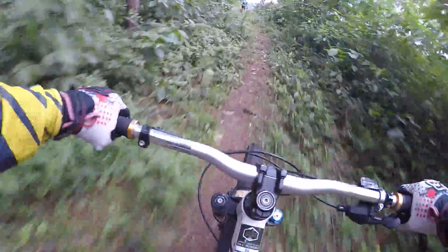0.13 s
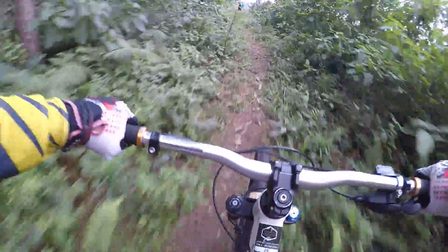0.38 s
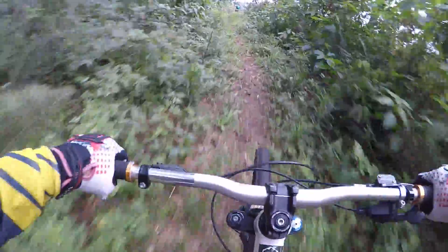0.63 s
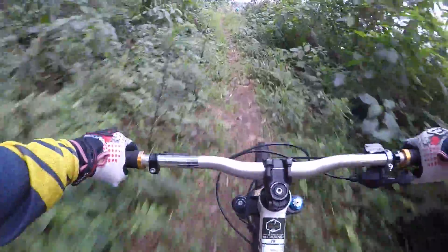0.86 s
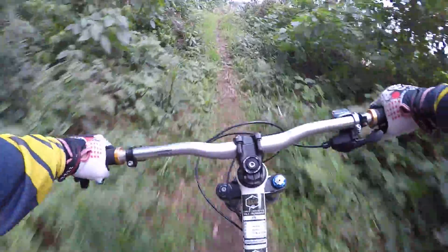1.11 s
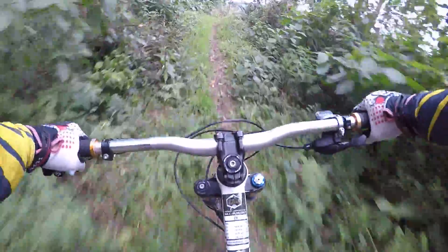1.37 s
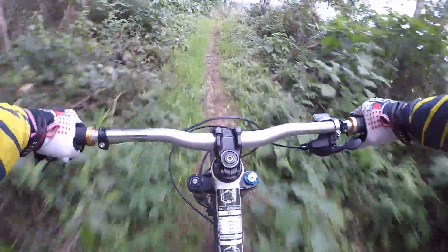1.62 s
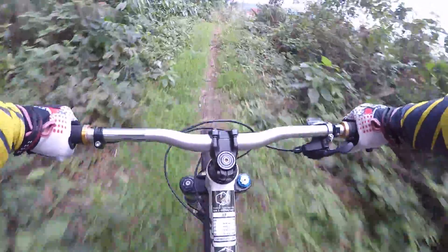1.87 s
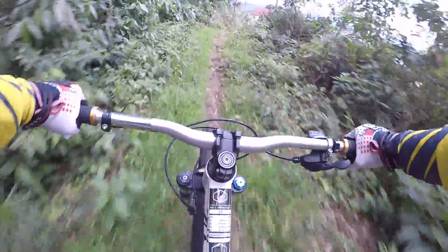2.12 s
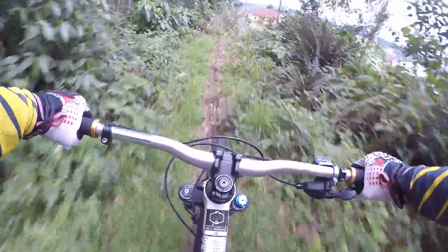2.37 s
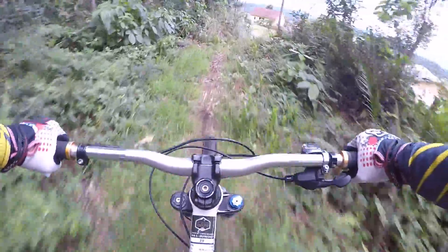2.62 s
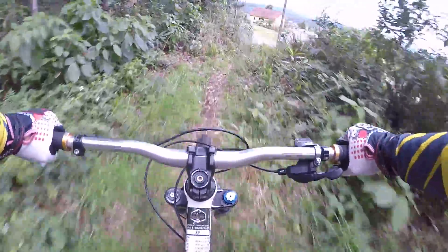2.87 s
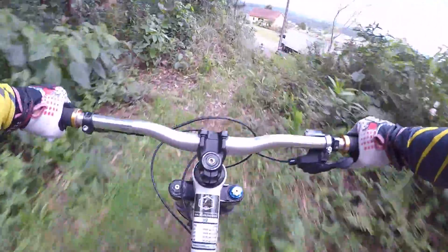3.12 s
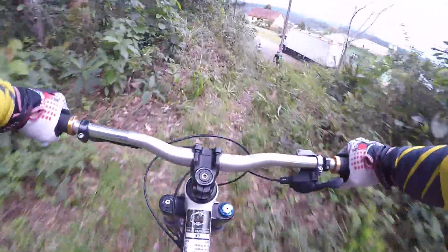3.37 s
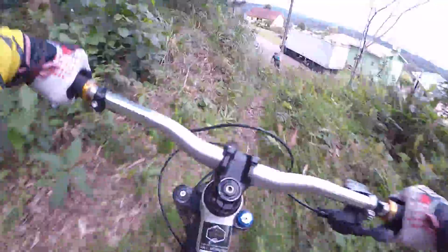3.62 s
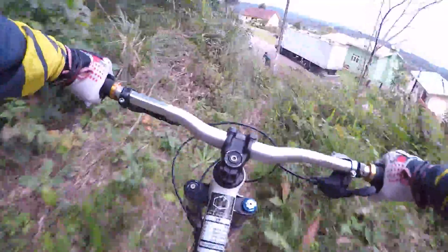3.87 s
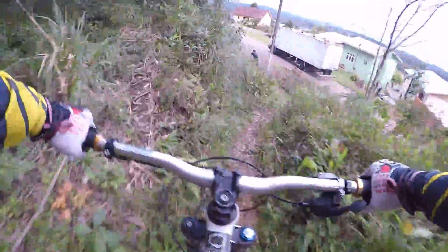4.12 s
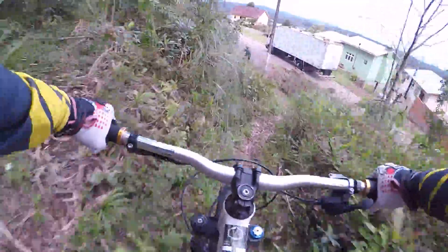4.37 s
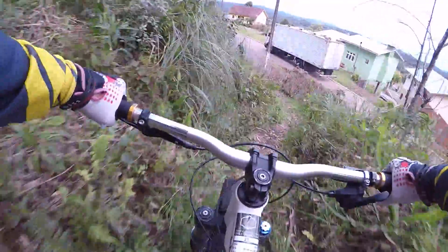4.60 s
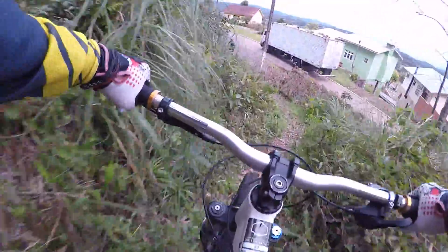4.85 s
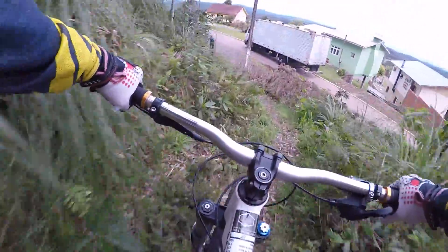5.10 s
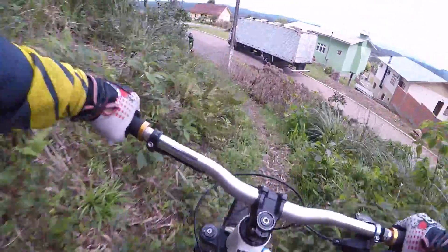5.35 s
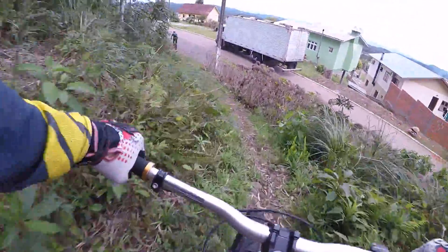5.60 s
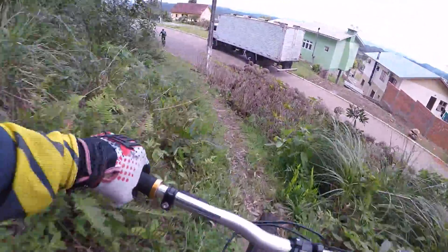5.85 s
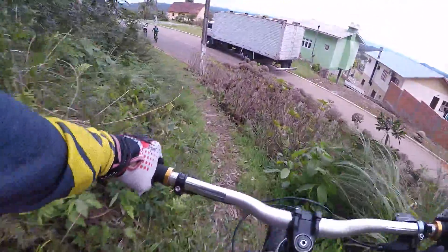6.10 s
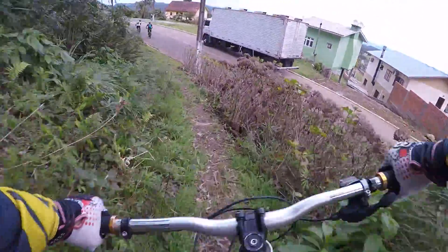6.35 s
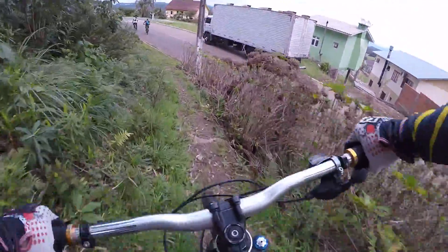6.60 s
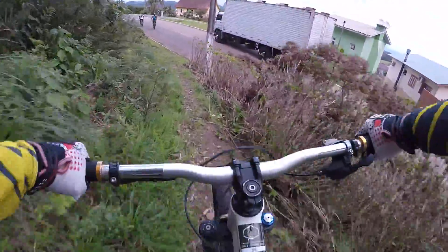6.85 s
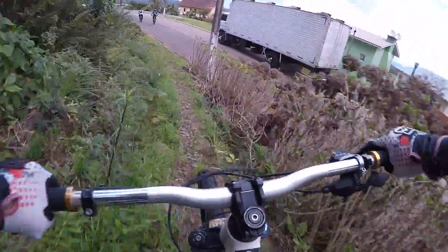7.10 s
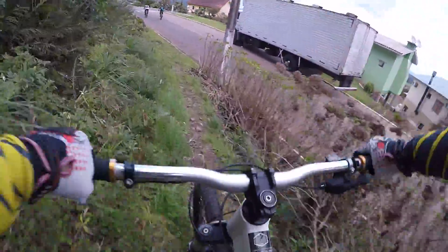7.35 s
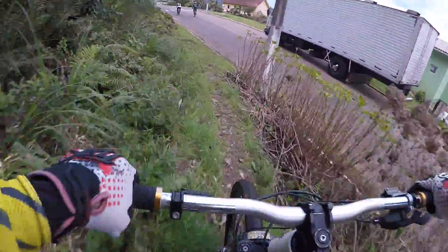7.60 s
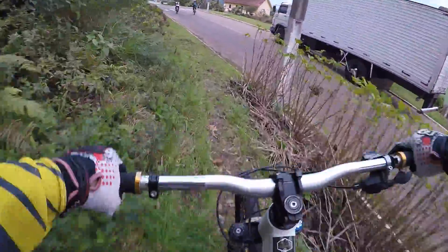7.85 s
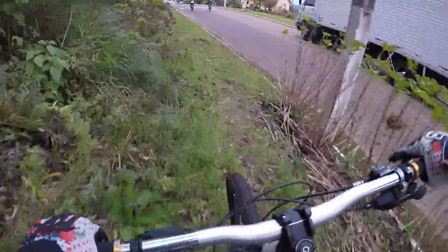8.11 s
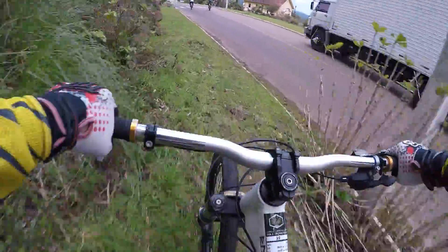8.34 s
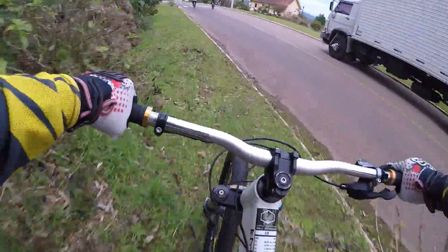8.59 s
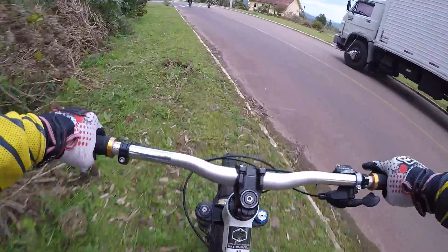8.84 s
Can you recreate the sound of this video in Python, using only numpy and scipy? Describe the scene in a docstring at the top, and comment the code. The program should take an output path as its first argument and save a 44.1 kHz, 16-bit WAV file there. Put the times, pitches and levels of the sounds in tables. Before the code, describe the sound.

Close, wind-buffeted microphone on a cyclist's chest. Tyres hiss through grass and dirt, the freewheel whirrs, a brake disc rubs very faintly, and short metallic knocks come irregularly. Midway, gusts become lighter and clicks slower and clearer. Later the wind returns, plants brush past, spokes ping, and a dense run of rattles and dull thuds comes near the end.

```python
"""Grassy dirt trail: a mountain bike coasts downhill, heard at one microphone on the rider's chest.
Wind is four bands of noise swelled by gusts; tyres, grass and brushing plants are flickering noise.
The freewheel is a noise burst per tooth; the brake disc is resonators under continuous, uneven rubbing.
Knocks, thuds and spoke pings are resonators hit by ragged blows; one bird is a falling sine."""
import sys
import numpy as np
from scipy import signal
from scipy.io import wavfile
from scipy.ndimage import uniform_filter1d

SR = 44100
rng = np.random.default_rng(int(sys.argv[2]) if len(sys.argv) > 2 else 0)


def field_ratio(decibels):
    """Amplitude ratio for a level in dB (20 dB per decade); scalars and array-likes work."""
    return 10 ** (np.asarray(decibels, dtype=float) / 20)


def dump(signal):
    """Clip the signal to [-1, 1] and save it as 16-bit WAV at the path in sys.argv[1]."""
    limited = np.clip(np.atleast_2d(signal).T, -1, 1)
    pcm = np.round(limited * 32767).astype(np.int16)
    wavfile.write(sys.argv[1], SR, pcm)


N = 395577

# Levels below are ahead of the output gain in record(); spectra are relative.
# Wind at the ports: t/s, strength/dB, churn/dB (gain of small fast eddies on large slow ones)
WIND_COURSE = [(0.0, -18.5, 1), (0.35, -17.5, 5.0), (0.6, -21.0, 3.5), (0.9, -24.5, -2), (1.3, -20.0, 0.0),
               (1.7, -19.5, 0), (2.1, -18, -2), (2.5, -21.0, 2.0), (2.9, -23.5, -0.5), (3.3, -29.0, 1),
               (3.9, -30, 2), (4.5, -29, -0.5), (5.1, -30.5, -0.5), (5.6, -25.5, 1.5), (6.1, -30.5, -2),
               (6.6, -25, 0.0), (7.0, -23.5, 0), (7.5, -21.5, 2.5), (8.0, -22.0, 3), (8.45, -19.5, 9.5),
               (8.97, -21.5, -1.0)]
# Spectra of the wind layers, large eddies to small: f/Hz, density/dB per Hz
BUFFET_SPECTRUM = [(8, -9), (20, -0.5), (30, -3), (45, -5), (60, -34)]
THUMP_SPECTRUM = [(35, -15), (50, 1.5), (65, -1.5), (80, -8), (100, -13.5), (130, -37.5)]
FLUTTER_SPECTRUM = [(70, -16), (100, 4), (160, 0.5), (220, 0), (260, -9.5), (330, -29.5)]
ROAR_SPECTRUM = [(200, -48), (260, 0), (320, -2.5), (390, -7), (440, -18), (500, -22), (560, -51),
                 (700, -73)]
# Response of buffet, thump, flutter, roar:
# centre f/Hz, level/dB at strength -20 dB, share of strength (dB/dB), share of churn (dB/dB)
EDDY_RESPONSE = [(30, -13, 1.0, -1.08), (63.3, -17, 0.59, 0.28), (161.5, -21.5, 0.96, 0.99),
                 (340, -30, 1.12, 0.84)]
# Gusts and lulls: t/s, swell/dB, f/Hz of the eddies stirred most, length/s (full width at half swell)
GUST_EVENTS = [(0.288, 4, 55, 0.09), (0.467, 9, 340, 0.07), (0.56, 3.5, 251, 0.041), (0.64, -5.5, 55, 0.18),
               (0.7, -5.5, 340, 0.13), (1.017, 5.5, 102, 0.065), (1.162, -6, 340, 0.12),
               (1.443, 4, 340, 0.13), (1.445, 5.5, 74, 0.091), (1.59, -7.5, 101, 0.1),
               (1.973, 4.0, 340, 0.16), (2.184, -4, 74, 0.1), (2.29, -2.5, 340, 0.25),
               (2.37, 5.5, 30, 0.14), (2.478, 7.5, 136, 0.036), (2.677, 5, 340, 0.14),
               (2.785, 4.5, 40, 0.041), (2.98, 7.5, 30, 0.066), (3.153, -3.5, 340, 0.18),
               (3.18, -8.5, 40, 0.091), (3.497, 9.0, 134, 0.088), (3.52, 6.0, 30, 0.071),
               (3.63, -6, 74, 0.08), (3.853, -20, 98, 0.097), (4.064, 4.5, 340, 0.22),
               (4.207, -11.5, 100, 0.074), (4.427, -13, 74, 0.12), (4.69, 17, 136, 0.055),
               (4.8, -9, 100, 0.096), (4.85, 7.5, 30, 0.14), (5.014, -10, 55, 0.084),
               (5.225, -15, 136, 0.069), (5.314, 9.5, 98, 0.05), (5.61, 5.5, 340, 0.1),
               (5.63, -10, 136, 0.045), (5.694, 6, 74, 0.54), (5.734, -8, 340, 0.053),
               (5.842, 8.5, 252, 0.042), (6.15, 4.5, 30, 0.11), (6.174, 9, 251, 0.086),
               (6.42, -9, 40, 0.05), (6.56, -3, 185, 0.6), (6.86, 15.5, 100.6, 0.16),
               (6.88, 7.5, 340, 0.12), (7.09, 10.5, 74, 0.05), (7.2, -9.5, 74, 0.08), (7.21, 5, 30, 0.08),
               (7.26, -9, 253, 0.26), (7.488, 9.5, 100, 0.05), (7.566, 12.0, 253, 0.13),
               (7.64, 6, 340, 0.031), (7.9, 3, 40, 0.22), (8.067, 8, 74, 0.044), (8.133, -8.5, 185, 0.053),
               (8.167, -9, 30, 0.12), (8.318, 6, 30, 0.088), (8.573, -9, 30, 0.08), (8.588, 3.0, 251, 0.21)]
# Tyres and grass: t/s, hiss level/dB, ground roughness/dB
ROLL_COURSE = [(0.0, -45.5, 2.5), (0.22, -43, 3), (0.4, -47.5, 3), (0.62, -45, -1), (1.05, -43, -1),
               (1.75, -38.5, -1.5), (2.27, -43, 0.0), (3.7, -41.5, -0.5), (4.12, -44, 1), (4.52, -41, -1),
               (6.24, -43.5, 0.5), (6.75, -40.5, 0.5), (7.27, -42.5, 3), (8.29, -38.5, 2),
               (8.67, -42.5, 0.5), (8.97, -44, 1.5)]
# Spectra of tyre hiss, tread rumble, casing drone: f/Hz, density/dB per Hz
HISS_SPECTRUM = [(1180, -38), (2000, -14.5), (2630, -0.5), (3070, -3.5), (4100, 0), (5390, -1), (6560, 1.5),
                 (7980, 0), (11300, -13.5), (14600, -16.5), (15400, -34)]
TREAD_SPECTRUM = [(1000, -34), (1150, -10.5), (1280, -4.5), (1450, -0.5), (1900, -2.5), (2400, -6),
                  (3200, -21)]
CASING_SPECTRUM = [(300, -39), (380, -19), (470, 1.5), (560, -10.5), (650, 2.5), (740, 2.5), (980, -1),
                   (1100, -13), (1200, -32)]
# Freewheel speed: t/s, rate/teeth per s
TOOTH_RATE = [(0.0, 89.26), (0.6, 81.39), (1.5, 85.86), (2.4, 77.84), (2.7, 68.02), (3.3, 43.96),
              (3.9, 36.65), (4.2, 30.87), (4.5, 29.84), (4.8, 33.06), (5.7, 35.72), (6.3, 41.76),
              (6.9, 49.75), (7.2, 51.19), (7.8, 61.33), (8.1, 64.83), (8.97, 68.88)]
# Freewheel loudness: t/s, level/dB
RATCHET_LEVEL = [(0, -49), (.6, -51.5), (1.5, -45), (2.4, -49), (3, -42), (4, -41.5), (5, -40.5),
                 (6, -44.5), (7, -43), (8, -44), (8.97, -48)]
# Spectrum of a pawl burst: f/Hz, density/dB per Hz
PAWL_SPECTRUM = [(900, -21), (1500, -8.5), (3000, -3), (6500, -1), (8500, -3), (11000, -18.5), (15400, -15)]
# Bike modes: f/Hz, level/dB (relative within a part), t60/s before the shortening in knock()
BIKE_MODES = [(1410, -22, 0.11), (1490, 5.5, 0.19), (1650, 7.5, 0.091), (1866, 12.5, 0.034),
              (1990, -24, 0.044), (2640, 1, 0.17), (3150, 2, 0.021), (3570, -7, 0.024), (4020, 2, 0.047),
              (4500, 3, 0.029), (4850, -5, 0.079), (5600, 2.5, 0.051), (6350, 4, 0.094), (6800, 1.5, 0.065),
              (7000, -1, .03), (7840, -28, .025), (9044, 4, 0.009), (10900, -11, 0.022), (12400, -5, .015),
              (14100, -6, .015)]
# Knocks: t/s, level/dB, f/Hz struck hardest, fall/dB per octave away from it, nominal clatter length/s
KNOCK_EVENTS = [(.1713, -33, 4800, 8, 0.0023), (.4003, -25.5, 2290, 11, 0.0025),
                (.7019, -33, 4500, 10, .0035), (.7174, -35, 6700, 5, .0029), (.975, -30, 6700, 14, .0023),
                (1.1294, -34, 6700, 5, .0041), (1.5381, -30.5, 6700, 3, .0025),
                (1.8084, -34, 3800, 4, .0011), (1.8449, -29, 6700, 7, .0029),
                (1.9374, -31, 6900, 14, .0053), (2.1093, -30, 3400, -0.5, .0027),
                (2.5696, -33, 4700, 10, .0041), (2.6705, -31, 6700, 2, 0.0036),
                (2.7012, -39, 3400, -1, .0037), (2.9466, -24, 4700, 12, .0045),
                (3.2488, -30, 6700, 10, .0021), (3.372, -38, 6700, 3, .0076), (3.5652, -33, 1600, 4, .0058),
                (3.6418, -34, 3400, 8, .0029), (3.8991, -29, 6700, 2, 0.0051), (3.963, -37, 3400, 9, .0035),
                (4.1348, -32.5, 7600, 5, 0.011), (4.3624, -34, 1900, 6, 0.0059),
                (4.439, -32, 3200, 8, 0.0022), (4.4815, -32, 7400, 7, 0.0061),
                (4.6434, -35, 6000, 1, .0038), (4.6684, -29, 1900, 11, .0054),
                (4.9067, -41, 4800, 4, .0047), (5.111, -39, 6700, 11, 0.0026),
                (5.1704, -36, 6700, 4, 0.012), (5.4941, -32.5, 3400, 0.5, 0.014),
                (5.581, -36, 2600, 5, .0093), (5.6427, -28, 2500, 9, 0.0035),
                (5.6591, -15, 5600, 13, 0.0011), (5.9108, -28, 11800, 1, .0034),
                (5.935, -40, 6800, 3, .0035), (6.1991, -39, 3000, 2, .0091), (6.4397, -35, 6900, 5, 0.0081),
                (6.4758, -32, 3900, 11, .0045), (6.5833, -34, 3700, 10, .0046),
                (6.7234, -25, 2450, 6, 0.0042), (6.7712, -31.5, 11800, -2, 0.0039),
                (6.899, -29, 3900, 6, .0021), (7.0203, -34, 5200, 6, .0064), (7.0533, -36, 2600, 2, 0.0052),
                (7.1756, -30, 5200, 10, .0041), (7.3744, -32.5, 1600, 4, .0092),
                (7.3984, -35, 1900, 4, .0078), (7.555, -31.5, 6000, 11, 0.0091),
                (7.6259, -25.5, 4700, 12, .0023), (7.6856, -29, 6700, 5, .0029),
                (7.6961, -26, 1500, 8, 0.0027), (7.7085, -29.5, 6700, 6, 0.0033),
                (7.814, -29, 4200, 13, .007), (8.0158, -25, 5200, 9, 0.0043),
                (8.0487, -27.5, 2600, 5.5, .005), (8.1051, -30, 1600, 6, 0.0044),
                (8.1314, -27, 4500, 7, .0051), (8.1639, -30, 3800, 9, .0035),
                (8.1842, -23.5, 1620, 4, 0.0052), (8.2182, -31, 6700, 0.5, 0.0051),
                (8.2869, -26, 5500, 13, .0021), (8.3046, -28, 6550, 5, .0044),
                (8.4001, -31, 6700, 4.5, .01), (8.4984, -36.5, 6700, 1.5, 0.0097),
                (8.906, -34, 4100, 10, .0073)]
# Limits between the bike's parts: f/Hz
PART_EDGES_HZ = [1150, 2300, 5000, 9000, 15400]
# Thuds: t/s, peak level/dB, f/Hz, peak level/dB of the low push
THUD_EVENTS = [(3.565, -44, 850, -39), (3.899, -41, 850, -42), (4.673, -44, 724, -36),
               (5.334, -36, 655, -36), (5.491, -36, 754, -31), (5.579, -34, 689, -29),
               (5.644, -37, 710, -21), (5.858, -48, 720, -35), (6.12, -37, 750, -49),
               (6.312, -42, 716, -36), (6.857, -32, 980, -30), (7.101, -34, 860, -41),
               (7.29, -33, 634, -36), (7.375, -31, 996, -33), (7.674, -28, 940, -38),
               (7.805, -49, 641, -35), (7.89, -39, 864, -33), (8.049, -30, 730, -23),
               (8.173, -32, 735, -34), (8.234, -43, 869, -32), (8.451, -29, 705, -25)]
# Brushing plants: t/s, length/s, level/dB, centre f/Hz, width/Hz of each of two cascaded resonances
BRUSH_EVENTS = [(1.764, 0.12, -38.5, 5800, 2500), (2.638, 0.11, -40, 6000, 3000),
                (4.44, 0.064, -46, 1590, 500), (4.697, .04, -42, 2480, 300),
                (5.118, 0.094, -37, 5900, 3000), (5.474, 0.052, -35.5, 5850, 3500),
                (5.489, 0.043, -38.5, 1580, 500), (5.547, 0.065, -38.5, 1990, 600),
                (6.555, 0.065, -45, 1320, 60), (6.62, .03, -47, 4800, 300), (7.595, 0.16, -40, 1620, 600),
                (8.028, 0.15, -45, 1650, 500), (8.14, 0.043, -41, 6460, 1200),
                (8.316, .025, -39, 4850, 250), (8.654, 0.042, -46, 2580, 250)]
# Brake disc modes: f/Hz, level/dB relative to the drag, t60/s
DISC_MODES = [(2600, -1, .035), (4040, -2, .04), (4450, 1, .022), (6320, 0, .06), (6500, -2, .015)]
# Pad drag: t/s, level/dB
DRAG_COURSE = [(0, -53), (.3, -54.5), (.5, -62), (.9, -54.5), (1.5, -51.5), (2.3, -53), (3, -57),
               (3.8, -54.5), (4.2, -65), (6, -66), (8.97, -63)]
# Spoke pings: t/s, peak level/dB, f/Hz, t60/s
PING_EVENTS = [(2.9, -36, 2500, .025), (3.765, -35, 2600, .06), (4.415, -37, 2600, .04),
               (5.659, -31, 3720, 0.025), (6.604, -34, 4630, .02), (6.878, -33, 6470, .02),
               (7.018, -28.5, 3400, 0.029), (7.022, -27, 6900, .025), (7.034, -32, 5600, .025),
               (7.045, -30.5, 2700, 0.073), (7.145, -30, 2820, 0.034), (7.149, -32, 5600, .035)]
# Bird whistle: t/s, f/Hz, level/dB
BIRD_COURSE = [(5.672, 5680, -57), (5.69, 5400, -50), (5.74, 4530, -48), (5.757, 4320, -56),
               (5.8, 3950, -56), (5.85, 3620, -54), (5.875, 3480, -58)]


def evened(x):
    """Scales to rms 1."""
    return x / np.sqrt(np.mean(x ** 2) + 1e-20)


def read(points, hz):
    """Reads a spectrum in dB on a log-frequency axis; -120 dB outside it."""
    f, value = np.transpose(points)
    return np.interp(np.log(hz + 1), np.log(f + 1), value, left=-120, right=-120)


def curve(rows, index):
    """One table column, interpolated to every sample."""
    rows = np.array(rows)
    return np.interp(np.arange(N) / SR, rows[:, 0], rows[:, index])


def drift(hz):
    """Slow random curve up to about hz, rms 1."""
    count = int(N / SR * hz * 2) + 2
    return evened(np.interp(np.arange(N), np.linspace(0, N, count), rng.standard_normal(count)))


def noise(shape, size, patchy_db):
    """Coloured noise from random short-time spectra with drifting patches, rms 1."""
    hz = np.fft.rfftfreq(size, 1 / SR)
    real, imag, patches = rng.standard_normal((N * 4 // size + 5, len(hz), 3)).T
    patches = uniform_filter1d(patches, size=6, axis=0)  # across frequency
    patches = evened(uniform_filter1d(patches, size=10, axis=1))  # across time
    spectra = (real + 1j * imag) * field_ratio(read(shape, hz)[:, None] + patchy_db * patches)
    return evened(signal.istft(spectra, nperseg=size, noverlap=size * 3 // 4)[1][:N])


def steady(x, size):
    """Evens out the chance swells of a narrow band over size samples."""
    return evened(x / np.sqrt(uniform_filter1d(x ** 2, size=size) + 0.094))


def ring(drive, hz, t60_s):
    """One damped mode: a two-pole resonator."""
    radius = 10 ** (-3 / (max(t60_s, .0006) * SR))
    w = 2 * np.pi * hz / SR
    return signal.lfilter([1, 0, -1], [1, -2 * radius * np.cos(w), radius * radius], drive)


def clatter(length_s):
    """A ragged run of tiny blows: short ones start almost at once, long ones swell."""
    t = np.arange(4000) / SR
    rise_s = np.clip(14 * length_s ** 2, .0001, .01)
    decay_s = np.clip(0.82 * length_s, .0003, .03)
    rise = 1 - np.exp(-t / rise_s)
    return rng.standard_normal(len(t)) * rise * np.exp(-(t / decay_s) ** 0.8)


def gusts(centre_hz):
    """Swell in dB that gusts and lulls give to eddies of one size."""
    reach_octaves = 0.69  # spread to neighbouring eddy sizes
    t = np.arange(0, N / SR, .005)[:, None]
    s, db, hz, length_s = np.transpose(GUST_EVENTS)
    reach = np.exp(-.5 * (np.log2(hz / centre_hz) / reach_octaves) ** 2)
    swell_db = np.exp(-4 * np.log(2) * ((t - s) / length_s) ** 2) @ (db * reach)
    return np.interp(np.arange(N) / SR, t[:, 0], swell_db)


def wind():
    """Eddies at the microphone ports: the two faster layers come in partly shared lumps."""
    lumps = drift(hz=27.9)
    buffet = steady(noise(BUFFET_SPECTRUM, size=8192, patchy_db=-2.0), size=2600)
    buffet = buffet * field_ratio(0.87 * drift(hz=8))
    thump = steady(noise(THUMP_SPECTRUM, size=8192, patchy_db=-1), size=2000)
    thump = thump * field_ratio(1.44 * drift(hz=11))
    flutter = steady(noise(FLUTTER_SPECTRUM, size=4096, patchy_db=2.5), size=1800)
    flutter = evened(flutter * field_ratio(2.7 * lumps))
    roar = noise(ROAR_SPECTRUM, size=2048, patchy_db=2.0)
    roar = evened(roar * field_ratio(1.8 * lumps + 1.8 * drift(hz=30.03)))
    strength_db = curve(WIND_COURSE, index=1) + 20
    churn_db = curve(WIND_COURSE, index=2)
    out = np.zeros(N)
    for row, layer in zip(EDDY_RESPONSE, (buffet, thump, flutter, roar)):
        hz, db, strength_share, churn_share = row
        level_db = db + strength_share * strength_db + churn_share * churn_db + gusts(hz)
        out += field_ratio(level_db) * layer
    return out


def rolling():
    """Tyre hiss, tread rumble and casing drone flicker together as the ground changes."""
    ground = drift(hz=26.1)
    hiss = noise(HISS_SPECTRUM, size=512, patchy_db=2.0)
    hiss = evened(hiss * field_ratio(1.0 * ground))
    tread = noise(TREAD_SPECTRUM, size=1024, patchy_db=1.5)
    tread = evened(tread * field_ratio(2.25 * ground + 1.0 * drift(hz=40)))
    drone = noise(CASING_SPECTRUM, size=2048, patchy_db=1.5)
    drone = evened(drone * field_ratio(1.45 * ground + 1.2 * drift(hz=22.05)))
    rough_db = curve(ROLL_COURSE, index=2)
    # against the hiss; rough ground raises both
    tread_gain, drone_gain = field_ratio(-5.5 + rough_db), field_ratio(-10 + 1.1 * rough_db)
    return field_ratio(curve(ROLL_COURSE, index=1)) * (hiss + tread_gain * tread + drone_gain * drone)


def freewheel():
    """Pawls drop at each tooth: a short noise burst of uneven timing and strength."""
    jitter_s, uneven_db = .002, 2.6
    rise_s, decay_s = .0015, .0027
    teeth = np.cumsum(curve(TOOTH_RATE, index=1)) / SR
    at = np.flatnonzero(np.diff(np.floor(teeth)))
    draws = rng.standard_normal((len(at), 2))
    late = (draws[:, 0] * jitter_s * SR).astype(int)
    drops = np.zeros(N)
    drops[np.clip(at + late, 0, N - 1)] = field_ratio(uneven_db * draws[:, 1])
    t = np.arange(1500) / SR
    envelope = signal.oaconvolve(drops, t / rise_s * np.exp(-t / decay_s))[:N]
    ratchet = evened(envelope * noise(PAWL_SPECTRUM, size=256, patchy_db=2.5))
    return field_ratio(curve(RATCHET_LEVEL, index=1)) * ratchet


def knock(db, struck_hz, fall_db, length_s):
    """One clatter rings tubes, chain, cables and a dry crack; each place struck favours other modes."""
    blows = clatter(length_s)
    luck = rng.standard_normal((len(BIKE_MODES), 2))
    modes = []
    for (hz, mode_db, t60_s), (level_luck, pitch_luck) in zip(BIKE_MODES, luck):
        level_db = mode_db + 2.5 * level_luck - fall_db * abs(np.log2(hz / struck_hz))
        tone = ring(blows, hz * (1 + .03 * pitch_luck), .22 * t60_s)
        modes.append(field_ratio(level_db) * evened(tone))
    modes = np.array(modes)
    part = np.digitize(np.array(BIKE_MODES)[:, 0], PART_EDGES_HZ[1:-1])
    out = np.zeros(len(blows))
    for k, (lo, hi) in enumerate(zip(PART_EDGES_HZ, PART_EDGES_HZ[1:])):
        band = signal.butter(2, [lo, hi], "band", fs=SR, output="sos")
        part_db = db - fall_db * abs(np.log2(np.sqrt(lo * hi) / struck_hz))
        if struck_hz < lo == PART_EDGES_HZ[-2]:
            part_db -= 14  # dry crack on top: weak unless a twig snaps right on it
        out += field_ratio(part_db) * evened(signal.sosfilt(band, modes[part == k].sum(axis=0)))
    return out * np.sqrt(length_s * SR / len(out))  # level refers to the clatter length


def knocks():
    """Loud knocks over a scatter of faint ticks, and dull resonant thuds of the saddle and mount."""
    out = np.zeros(N + 4000)
    ticks = []
    for s, u, v in rng.random((200, 3)):
        ticks.append((s * N / SR, -42 - 13 * u, 1800 * 3.1 ** v, 7, .004))  # columns as KNOCK_EVENTS
    for s, *blow in list(KNOCK_EVENTS) + ticks:
        out[round(s * SR):][:4000] += knock(*blow)
    for s, db, hz, push_db in THUD_EVENTS:
        blows = clatter(0.0069)
        thud = ring(ring(blows, hz, 0.024), hz, 0.0058)
        push = ring(ring(blows, 380, 0.014), 380, 0.007)
        both = field_ratio(db) * thud / abs(thud).max() + field_ratio(push_db) * push / abs(push).max()
        out[round(s * SR):][:len(both)] += both
    return out[:N]


def brush():
    """Leaves and stalks drag along the bike: grainy noise around one pitch."""
    out = np.zeros(N)
    for s, length_s, db, hz, width_hz in BRUSH_EVENTS:
        size = round(length_s * SR)
        grain = rng.standard_normal(size)
        grain = grain * field_ratio(5.1 * evened(uniform_filter1d(rng.standard_normal(size), size=150)))
        t60_s = 2.2 / width_hz
        rub = ring(ring(grain, hz, t60_s), hz, t60_s)
        out[round(s * SR):][:size] += field_ratio(db) * evened(rub) * signal.windows.tukey(size, .6)
    return out


def brake():
    """Dragging pads, as uneven noise, keep the disc modes faintly ringing."""
    rub = rng.standard_normal(N) * field_ratio(3.7 * drift(hz=14))
    disc = sum(field_ratio(db) * evened(ring(rub, hz, t60_s)) for hz, db, t60_s in DISC_MODES)
    return field_ratio(curve(DRAG_COURSE, index=1)) * disc


def pings():
    """Flicked pebbles and twigs each sound one spoke mode."""
    out = np.zeros(N)
    for s, db, hz, t60_s in PING_EVENTS:
        ping = ring(ring(clatter(0.0031), hz, t60_s), hz, 0.0043)
        out[round(s * SR):][:len(ping)] += field_ratio(db) * ping / abs(ping).max()
    return out


def bird():
    """One falling whistle: a sine of gliding pitch and level."""
    s, hz, db = np.transpose(BIRD_COURSE)
    t = np.arange(s[0], s[-1], 1 / SR)
    phase = 2 * np.pi * np.cumsum(np.interp(t, s, hz)) / SR
    tone = np.sqrt(2) * np.sin(phase) * field_ratio(np.interp(t, s, db))
    out = np.zeros(N)
    out[round(s[0] * SR):][:len(t)] = tone * signal.windows.tukey(len(t), .15)
    return out


def scene():
    """Sums all sources at one microphone."""
    mix = wind() + rolling() + freewheel() + knocks() + brush() + brake() + pings() + bird()
    return mix[None]


def top_cut(x):
    """Nothing passes above the cut-off."""
    return signal.sosfilt(signal.butter(12, 15810, fs=SR, output="sos"), x)


def record(dry):
    """Rounds off the loudest peaks softly, then limits the band to 15350 Hz."""
    rounded = 1.145 * np.tanh(dry / 1.396)
    edge = signal.firwin(401, 15350, fs=SR)[None]
    mix = signal.oaconvolve(rounded, edge, "same")
    return top_cut(mix)


dry = scene()
out = record(dry)
dump(out)
```